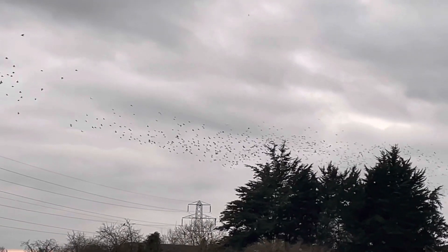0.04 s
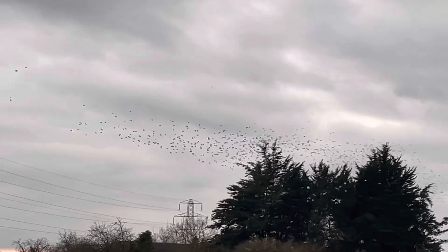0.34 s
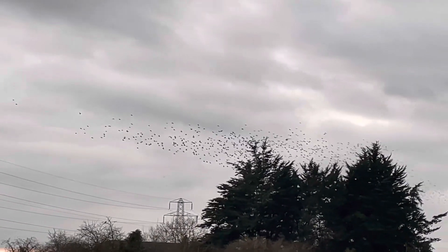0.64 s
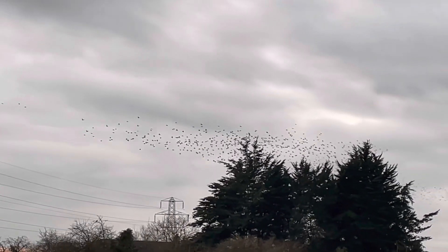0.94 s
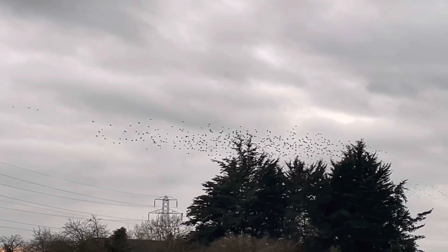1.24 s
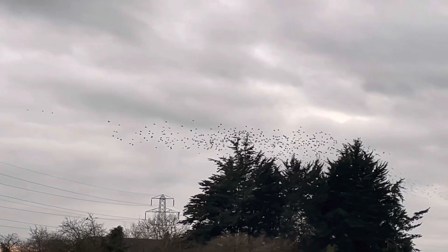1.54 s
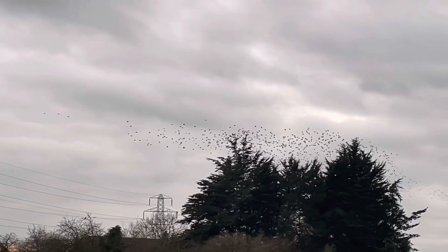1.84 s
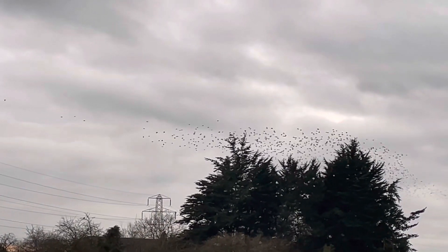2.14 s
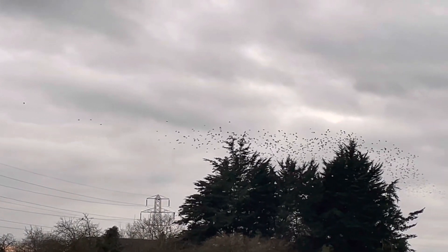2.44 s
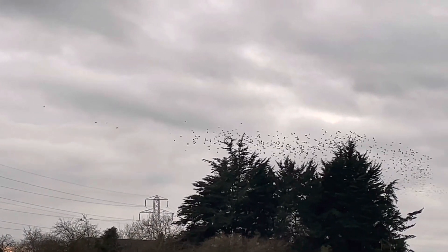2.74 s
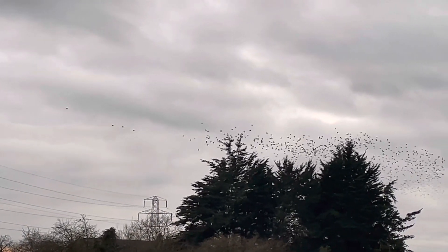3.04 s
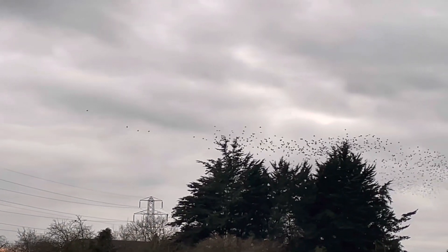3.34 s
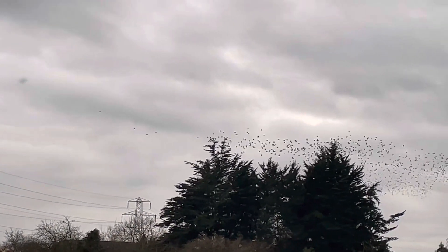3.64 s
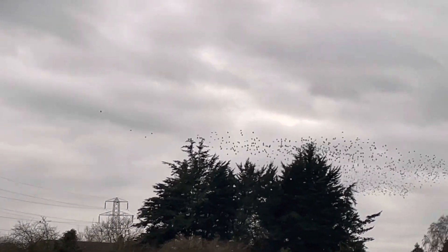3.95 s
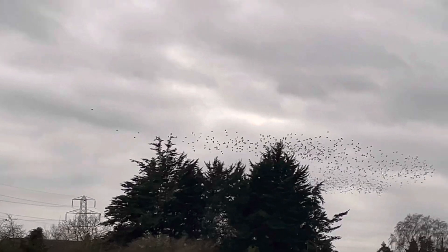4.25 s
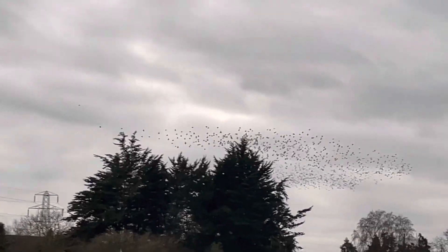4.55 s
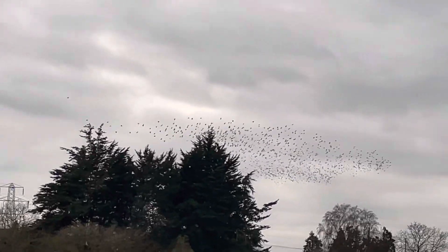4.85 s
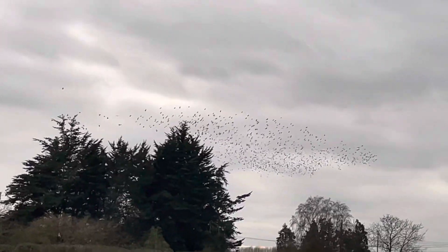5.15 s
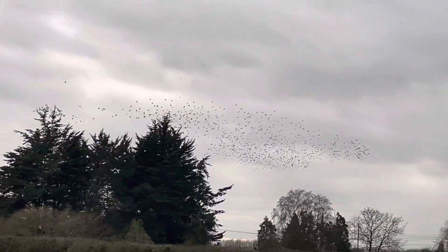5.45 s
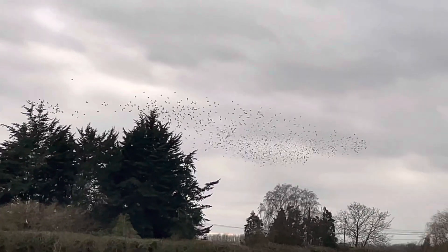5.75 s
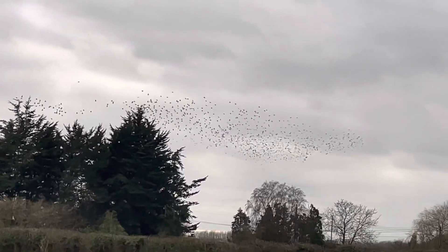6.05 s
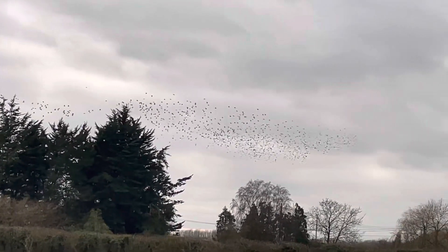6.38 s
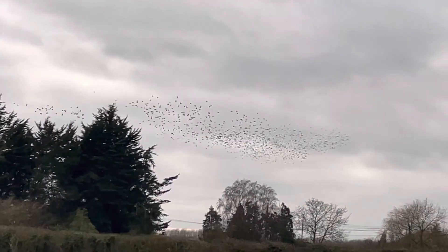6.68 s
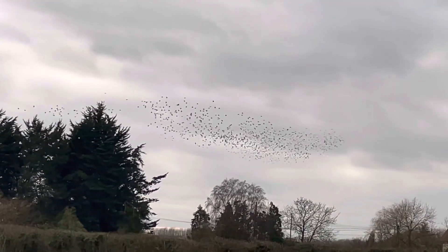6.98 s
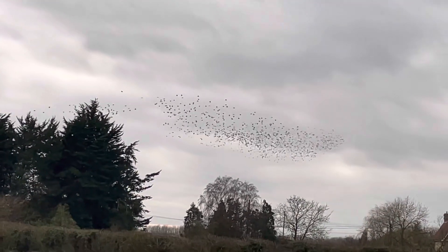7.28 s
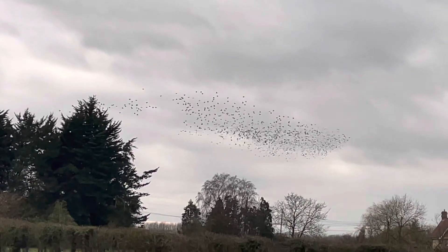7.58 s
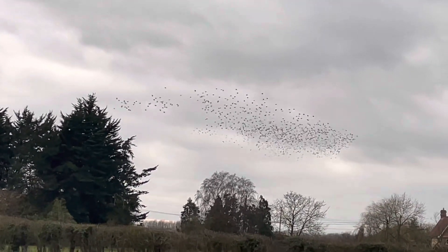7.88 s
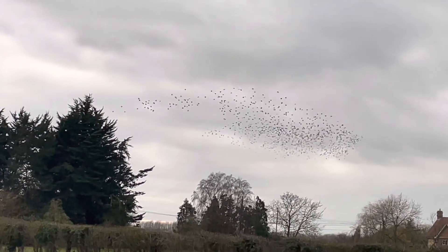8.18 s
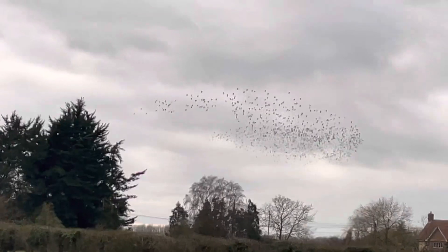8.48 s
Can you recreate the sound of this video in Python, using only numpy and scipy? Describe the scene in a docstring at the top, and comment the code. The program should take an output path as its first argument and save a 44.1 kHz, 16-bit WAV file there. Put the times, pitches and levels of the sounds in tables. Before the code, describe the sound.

Countless far-off birds call together in a high, hissing twitter, while a breeze softly buffets the microphone and a road hums.

```python
"""A large flock of starlings wheels over conifers across an open field on a winter evening.
Thousands of far calls merge into a rushing hiss that swells in flurries as neighbours set each other off.
Harsh squeals and thin whistles rise out of it: gliding syrinx tones, scattered by the trees.
Behind them a distant road hums, and a light breeze sheds eddies on the microphone, which ticks faintly."""
import sys
import numpy as np
from scipy import signal
from scipy.fft import rfft, irfft, next_fast_len
from scipy.io import wavfile
from scipy.ndimage import uniform_filter1d, map_coordinates

SR = 44100
rng = np.random.default_rng(int(sys.argv[2]) if len(sys.argv) > 2 else 0)


def transcribe(signal):
    """Save signal, clipped to [-1, 1], as a 16-bit WAV file at the path in sys.argv[1]."""
    frames = np.atleast_2d(signal).T
    limited = np.clip(frames, -1, 1)
    pcm = np.round(limited * 32767).astype(np.int16)
    wavfile.write(sys.argv[1], SR, pcm)


N = 384552

# The slow swell of the flock in three registers.
# Each row: time in seconds, then relative levels in dB of low chatter, twitter and shrill calls.
CHORUS = [(0.0, -55, -58, -59), (0.34, -58, -59.5, -61.5), (0.87, -55.5, -59, -54.5), (1.36, -57, -60, -60),
          (2.11, -55.5, -59, -55.5), (2.28, -56, -56.5, -57), (3.67, -57, -57.5, -56.5),
          (4.13, -57.5, -57.5, -58.5), (4.54, -57, -56.5, -55.5), (4.98, -59, -58, -59),
          (5.56, -56, -57.5, -54), (6.63, -58.5, -60, -59), (7.07, -56.5, -59.5, -55),
          (7.55, -55.5, -58.5, -59.5), (8.23, -56.5, -59, -56.5), (8.72, -56.5, -59, -62.5)]


def from_db(db):
    """Decibels to gain."""
    return 10 ** (np.asarray(db) / 20)


def rms_one(x):
    """Scale to unit power."""
    return x / np.sqrt(np.mean(x ** 2) + 1e-20)


def in_time(rows):
    """Turn rows of a time and its values into one sample-by-sample curve per value column."""
    times, *columns = np.transpose(rows)
    return [np.interp(np.arange(N) / SR, times, column) for column in columns]


def at_hz(points, hz):
    """Read a curve on a log-frequency axis."""
    known_hz, values = np.transpose(points)
    return np.interp(np.log(np.maximum(hz, 1)), np.log(known_hz), values)


def drift(rate):
    """A smooth random wobble of unit power that takes a new value `rate` times a second."""
    knots = rng.standard_normal(4096)
    coarse = map_coordinates(knots, [np.arange(0, N + 64, 64) * rate / SR], order=3, mode="wrap")
    return rms_one(np.interp(np.arange(N) / 64, np.arange(len(coarse)), coarse))


def add(out, start_s, sound):
    """Mix a sound in at its start time."""
    start = max(int(start_s * SR), 0)
    room = out[start:start + len(sound)]
    room += sound[:len(room)]


def coloured(x, spectrum):
    """Shape a sound with an EQ curve and bring it to unit power."""
    size = next_fast_len(N)
    hz = np.arange(size // 2 + 1) * SR / size
    return rms_one(irfft(rfft(x, size) * from_db(at_hz(spectrum, hz)), size)[..., :N])


def ports(x):
    """Sound meets the two microphone ports at a phase that depends on pitch; their sum keeps its level."""
    # Phase between the ports. Each row: frequency in Hz, lead of the left port in radians.
    port_phase = [(600, 0), (1300, 1.2), (1600, 0), (1900, -.7), (2200, 0), (2700, .38), (3600, 0),
                  (6300, 0), (6630, 1.45), (6950, 2.45), (7600, 2.6), (8500, 2.2), (9200, 1.55),
                  (10000, .1)]
    size = next_fast_len(N)
    lead = np.clip(at_hz(port_phase, np.arange(size // 2 + 1) * SR / size), -2.8, 2.8)
    side = irfft(rfft(x, size) * 1j * np.tan(lead / 2), size)[:N]
    return np.array([x + side, x - side])


def wash(spectrum, side_db):
    """Smooth far noise from a wide field, partly unlike at the two ports."""
    mid, side = coloured(rng.standard_normal((2, N)), spectrum)
    return ports(mid) + from_db(side_db) * side * [[1], [-1]]


def road():
    """Distant traffic blurs into a bed of tyre roar and low drone."""
    # The traffic's ebb and flow. Each row: time in seconds, relative roar and drone levels in dB.
    traffic = [(0.0, -68, -78.5), (.6, -70.5, -78.5), (1.2, -69.5, -74.5), (1.7, -67.5, -81.5),
               (2.4, -66, -80), (3.5, -67.5, -78.5), (4.01, -69, -76.5), (4.27, -71, -76.5),
               (4.66, -72.5, -83.5), (5.29, -70, -78), (6.41, -71, -74.5), (7.0, -70, -74.5),
               (7.41, -69, -79), (8.21, -69.5, -79), (8.4, -65.5, -68.5), (8.72, -70.5, -78)]
    # The colours of the roar and the drone. Each row: frequency in Hz, relative gain in dB.
    roar_eq = [(450, -20), (700, -6), (1000, 1), (1350, -4.5), (1750, -8), (3200, -17), (4500, -76)]
    drone_eq = [(30, 1.5), (70, 7), (150, 11.5), (350, 8), (470, -0.5), (650, 1), (1000, -9.5), (3500, -61)]
    roar_db, drone_db = in_time(traffic)
    roar = from_db(roar_db + 0.9) * wash(roar_eq, side_db=-4.0)
    drone = from_db(drone_db + 7.5) * wash(drone_eq, side_db=-7)
    return roar + drone


def tick(db, hz=720, rise_s=0.00041):
    """A dull tick, gone within a cycle or two."""
    t = np.arange(SR // 3) / SR
    envelope = t / rise_s * np.exp(1 - np.minimum(t / rise_s, 60))
    return from_db(db) * np.sin(2 * np.pi * hz * t) * envelope


def ticks(snap_s=0.1435, snap_db=-55, snap_decay_s=0.00025):
    """Light ticks on the microphone and one tiny bright snap on its housing."""
    # The ticks. Each row: start in seconds, envelope peak in dB.
    hits = [(.144, -43.5), (0.233, -47.5), (.275, -55), (0.333, -48), (3.931, -46.5), (4.072, -51),
            (8.478, -43.5), (8.516, -41), (8.544, -40.5)]
    out, t = np.zeros(N), np.arange(SR // 200) / SR
    for start_s, db in hits:
        add(out, start_s, tick(db))
    add(out, snap_s, from_db(snap_db) * rng.standard_normal(len(t)) * np.exp(-t / snap_decay_s))
    return out


def airflow_db(rise_share=0.56):
    """Gusts build and die away in bell shapes on top of the light air."""
    # Light air between gusts. Each row: time in seconds, level in dB.
    breeze = [(0, -50), (.6, -58.5), (1.5, -52), (2.25, -56), (2.7, -66), (3.4, -53.5), (3.85, -68),
              (4.8, -71.5), (5.2, -64.5), (5.95, -74.5), (6.15, -55), (6.55, -63), (7.1, -53.5),
              (7.65, -62), (8.2, -56.5), (8.72, -64)]
    # The gusts. Each row: time of the peak in seconds, length in seconds, peak level in dB.
    gusts = [(1.917, 0.4, -41.5), (3.48, 0.2, -49), (4.446, 0.16, -62.5), (5.044, 0.055, -54.5),
             (5.234, 0.12, -57), (6.778, 0.17, -56.5), (7.29, 0.043, -50), (7.503, 0.088, -54.5),
             (7.694, 0.056, -52.5), (7.98, 0.15, -53.5), (8.53, 0.24, -51.5)]
    breeze_db, = in_time(breeze)
    t, power = np.arange(N) / SR, from_db(breeze_db) ** 2
    for peak_s, length, db in gusts:
        from_peak = (t - peak_s) / (length * np.where(t < peak_s, rise_share, 1 - rise_share))
        power += from_db(db) ** 2 * np.exp(-2 * np.minimum(from_peak ** 2, 20))
    return 10 * np.log10(power)


def eddy(db, hz):
    """A vortex crosses the port: a puff that builds for some turns and sinks in pitch as it widens."""
    t = np.arange(SR // 3) / SR
    turns = 1.22 * (100 / hz) ** 0.36   # lower, wider eddies take more turns to build
    age = t * hz / turns   # 1 at the peak of the puff
    envelope = (2 * age / (1 + age * age)) ** 4
    return from_db(db) * np.sin(2 * np.pi * 3.1 * turns * np.log1p(age / 1.7)) * envelope


def wind(lumpy_db=2.5, side_db=-15, small_count=200):
    """Lumpy low buffeting swells with the breeze, small eddies less steeply; big eddies thump through."""
    # Single eddies on the microphone. Each row: start in seconds, level in dB, nominal pitch in Hz.
    thumps = [(.144, -40, 185), (0.232, -37.5, 198), (.275, -38, 190), (0.334, -38.5, 173),
              (.503, -47.5, 150), (1.168, -47.5, 230), (1.285, -51, 240), (1.553, -42, 64),
              (1.729, -37, 60.6), (1.794, -32, 61), (1.824, -31, 147), (1.87, -31.5, 70),
              (1.902, -29.5, 71), (1.986, -32, 72.5), (2.036, -39, 69), (3.022, -52, 140),
              (3.322, -47, 170), (3.343, -45.5, 144), (3.418, -42, 125), (3.459, -39.5, 85),
              (3.5, -45.5, 150), (3.61, -49.5, 165), (3.663, -46, 100), (3.702, -46.5, 72),
              (3.931, -56, 280), (4.052, -53.5, 230), (4.168, -53, 228), (4.4, -49.5, 145),
              (4.441, -44.5, 136), (5.03, -49, 94.5), (6.079, -48, 83.6), (6.181, -47, 93),
              (6.345, -42, 82), (6.43, -47.5, 85), (7.019, -43, 77), (7.184, -40, 68), (7.267, -48, 202),
              (7.42, -40.5, 72), (7.665, -48.5, 237), (7.814, -51, 175), (7.888, -49.5, 187),
              (7.95, -51, 210), (8.004, -49, 222), (8.063, -52, 164), (8.474, -40.5, 62)]
    # The colour of the buffeting. Each row: frequency in Hz, relative gain in dB.
    buffet_eq = [(20, -31), (35, -8), (50, 4), (72, 0.5), (98, -1.5), (125, -10), (180, -13), (260, -34.5),
                 (400, -62), (1500, -85)]
    level_db = airflow_db()
    small, big = np.zeros((2, N)), np.zeros(N)
    for when, pitch, weakness, left_share in rng.random((small_count, 4)):
        puff = eddy(-14 * weakness, 75 * 2 ** (1.86 * pitch)) + tick(-21.5)
        add(small[0], when * N / SR, left_share * puff)   # a small eddy favours one port
        add(small[1], when * N / SR, (1 - left_share) * puff)
    for start_s, db, hz in thumps:
        add(big, start_s, eddy(db, hz))
    mid, side = coloured(rng.standard_normal((2, N)), buffet_eq)
    mid = mid / np.sqrt(uniform_filter1d(mid ** 2, size=3500) + 1e-9)   # leave the slow swell to the air
    buffet = (mid + from_db(side_db) * side * [[1], [-1]]) * from_db(lumpy_db * drift(30))
    return from_db(level_db) * buffet + from_db(0.35 * level_db - 48) * rms_one(small) + big


def trees(x, t60, wet_db):
    """Trunks and hedges scatter a short diffuse tail behind each call."""
    t = np.arange(SR // 2) / SR
    tail = rng.standard_normal(len(t)) * from_db(-60 * t / t60)
    return x + from_db(wet_db) * signal.fftconvolve(x, tail / np.linalg.norm(tail))[:N]


def call(length, start_hz, end_hz, warble_hz, warble_rate, rasp_hz, wander=0, ragged_db=0):
    """A gliding, warbling syrinx tone: fast pitch jitter makes it harsh, wander and flicker ragged."""
    progress = np.linspace(0, 1, max(int(length * SR), 64))
    t = progress * length
    jitter = np.interp(t, np.arange(1024) / 1500, rng.standard_normal(1024))
    hz = start_hz + (end_hz - start_hz) * progress + rasp_hz * jitter
    hz += warble_hz * np.sin(2 * np.pi * (warble_rate * t + rng.random()))
    swell = np.sqrt(np.abs(np.sin(np.pi * progress)))
    if wander or ragged_db:
        bend, flicker = (np.interp(t, np.arange(64) / 70, knots) for knots in rng.standard_normal((2, 64)))
        hz *= 1 + wander * bend
        swell *= from_db(ragged_db * flicker)
    return rms_one(np.sin(2 * np.pi * np.cumsum(hz) / SR) * swell)


def crowd(low_hz, high_hz, length, fall, rasp_hz, uneven_db, count, wander=0):
    """Many birds calling at random, each at its own pitch and distance, mostly sliding down."""
    out = np.zeros(N)
    for when, pitch, stretch, slide, distance in rng.random((count, 5)):
        start_hz = low_hz + (high_hz - low_hz) * pitch
        end_hz = start_hz * np.exp(fall * (0.3 - slide))
        cry = call(length * (0.5 + stretch), start_hz, end_hz,
                   warble_hz=37.8, warble_rate=30.7, rasp_hz=rasp_hz, wander=wander)
        add(out, when * N / SR, from_db(-uneven_db * np.sqrt(distance)) * cry)
    return rms_one(out)


def flurry_db(register_hz, spread_octaves=0.64):
    """Neighbours set each other calling: each flurry lifts the registers near its pitch in one arch."""
    # The flurries. Each row: middle in seconds, length in seconds, lift in dB at its pitch, pitch in Hz.
    flurries = [(0.068, 0.085, 6.5, 5600), (0.358, 0.27, 8, 6000), (0.644, 0.16, 3, 3700),
                (.97, .1, 2, 5000), (1.868, 0.32, 3, 5250), (2.03, 0.06, 2.5, 4500),
                (2.554, 0.092, 2.5, 4700), (2.713, 0.16, 7, 4700), (3.068, 0.12, 3, 5200),
                (3.435, 0.26, 5, 4870), (3.613, 0.11, 5.5, 4800), (3.774, 0.18, 3, 5700),
                (4.774, 0.24, 3.5, 5740), (5.244, 0.16, 5, 5500), (5.73, 0.26, 3, 5800),
                (6.42, 0.29, 5, 6240), (6.778, 0.14, 4, 5370), (8.37, 0.21, 3.5, 5130),
                (8.67, 0.068, 2.5, 4200)]
    t, lift = np.arange(N) / SR, np.zeros(N)
    for middle_s, length, db, hz in flurries:
        reach = np.exp(-(np.log2(register_hz / hz) / spread_octaves) ** 2)
        during = np.abs(t - middle_s) < length / 2
        lift[during] += db * reach * np.cos(np.pi * (t[during] - middle_s) / length)
    return lift


def far_whistles():
    """A tangle of faint, very high whistles from deeper in the flock."""
    tangle = crowd(7300, 9000, length=0.075, fall=0.11, rasp_hz=90, uneven_db=6, count=90, wander=0.009)
    return from_db(-85) * tangle


def whistles():
    """Thin, ragged, wavering whistles of single birds."""
    # The whistles. Each row: start and length in seconds, start and end pitch in Hz,
    # warble depth in Hz, level in dB.
    notes = [(0.09, 0.13, 8400, 7900, 22, -83), (.27, .11, 7900, 7650, 20, -86),
             (1.044, 0.06, 8200, 8200, 20, -79), (1.653, 0.16, 8530, 8160, 112, -76),
             (2.235, 0.14, 8550, 8950, 45, -77), (2.465, 0.1, 3300, 3420, -3, -63),
             (2.653, 0.1, 2290, 2350, -1, -63), (3.48, 0.135, 8500, 8950, 35, -74),
             (4.015, 0.15, 8140, 8550, 90, -76), (4.224, .03, 9200, 9150, 0, -79),
             (4.294, 0.13, 2414, 2445, 5, -62.5), (4.316, 0.064, 8930, 8700, -2, -75.5),
             (4.447, 0.1, 7840, 8450, 60, -77), (4.62, 0.16, 8700, 7400, 60, -77),
             (4.727, 0.2, 7900, 8180, 30, -74.5), (5.423, .11, 7500, 8050, 50, -80),
             (5.623, .05, 7400, 7800, 30, -78), (5.666, 0.17, 7950, 8400, 30, -76),
             (5.8, 0.073, 8350, 9000, 30, -76), (5.845, 0.19, 7500, 8200, 298, -71.5),
             (5.94, .07, 9100, 9100, 58, -76), (6.085, 0.054, 5700, 6200, 3, -56.5),
             (6.296, 0.15, 7650, 7600, 70, -82), (6.317, 0.18, 7830, 8730, 67, -77),
             (6.47, 0.11, 7800, 8450, 52, -80), (6.48, 0.23, 8760, 8900, 108, -79),
             (6.51, 0.13, 7400, 7800, 80, -75), (6.797, 0.16, 8650, 8250, 110, -76.5),
             (7.02, 0.059, 5600, 6780, 0, -66), (7.107, 0.19, 3380, 3060, 2, -64),
             (7.085, .06, 8900, 8400, 40, -78), (7.178, 0.087, 9050, 8950, 200, -76),
             (7.375, 0.1, 8450, 8550, 18, -81), (7.738, .28, 9250, 8240, 72, -75.5),
             (7.85, 0.091, 2060, 1894, 4, -64), (8.407, 0.3, 9300, 8500, 75, -76.5),
             (8.575, 0.059, 2870, 2960, -2, -64)]
    out = np.zeros(N)
    for start_s, length, start_hz, end_hz, warble_hz, db in notes:
        note = call(length, start_hz, end_hz, warble_hz,
                    warble_rate=25, rasp_hz=0.012 * start_hz, wander=0.0055, ragged_db=2.5)
        add(out, start_s, from_db(db) * note)
    return trees(out, t60=0.25, wet_db=-11)


def squeals(fall_octaves=0.22):
    """Harsh calls of the nearest birds, each sliding down by the same interval."""
    # The squeals. Each row: start and length in seconds, start pitch in Hz, relative level in dB.
    cries = [(0.0, 0.07, 7260, -71), (.72, .11, 7770, -74), (1.27, 0.05, 5940, -60),
             (2.08, 0.064, 6750, -60.5), (2.147, 0.075, 5550, -56.5), (2.291, 0.059, 6760, -61),
             (2.67, .06, 5100, -58.5), (3.065, 0.057, 5600, -59), (3.455, .065, 5500, -60),
             (5.187, 0.066, 6300, -63), (5.665, .1, 6710, -61), (6.033, 0.08, 6470, -64),
             (6.107, 0.08, 5430, -57.5), (6.267, 0.061, 6850, -60), (6.547, 0.033, 4700, -57),
             (6.79, 0.087, 5480, -58), (8.263, 0.11, 6080, -62)]
    out = np.zeros(N)
    for start_s, length, start_hz, db in cries:
        cry = call(length, start_hz, start_hz / 2 ** fall_octaves, warble_hz=40, warble_rate=70, rasp_hz=190)
        add(out, start_s, from_db(db + 0.5) * cry)
    return trees(out, t60=0.19, wet_db=-9.5)


def near_chirps():
    """Short overlapping chirps from the near edge of the flock ride the swell of the chorus."""
    _, _, shrill_db = in_time(CHORUS)
    chirps = crowd(4500, 6500, length=0.036, fall=0.2, rasp_hz=120, uneven_db=3, count=300, wander=0.012)
    return trees(from_db(shrill_db + flurry_db(5500) - 8) * chirps, t60=0.2, wet_db=-10)


def choir(voices, spectrum, voices_db, surge_db, surge_rate):
    """Nearer voices sit in the smooth hiss of the countless far ones, and the level flutters."""
    together = coloured(rng.standard_normal(N) + from_db(voices_db) * voices, spectrum)
    return together * from_db(surge_db * drift(surge_rate))


def flock():
    """The chorus in three registers swells slowly as the birds turn, and quickly in flurries."""
    # The colours of the low, middle and high voices. Each row: frequency in Hz, relative gain in dB.
    chatter_eq = [(1200, -27.5), (1600, -14), (1950, -2.5), (2500, 2), (2900, 2.5), (3250, -3.5),
                  (3600, -23), (4600, -74)]
    twitter_eq = [(2800, -37.5), (3350, -3.5), (3800, -0.5), (4250, 1.5), (4800, 0), (5200, -5.5),
                  (6000, -55.5)]
    shrill_eq = [(4000, -27), (4800, -7), (5250, 5.5), (5700, 4.5), (6200, 3.5), (6550, -1.5), (6900, -15),
                 (7300, -17), (8600, -21.5), (9500, -23.5), (10500, -38.5), (12000, -50), (13000, -69.5)]
    chatter_db, twitter_db, shrill_db = in_time(CHORUS)
    low = crowd(1800, 3500, length=0.0686, fall=0.1953, rasp_hz=114.7, uneven_db=3.5, count=1200)
    middle = crowd(3500, 5200, length=0.06, fall=0.25, rasp_hz=200, uneven_db=6, count=1000)
    high = crowd(5000, 9000, length=0.05, fall=0.27, rasp_hz=194, uneven_db=9, count=1800)
    chatter = choir(low, chatter_eq, voices_db=-14.0, surge_db=0.73, surge_rate=41)
    twitter = choir(middle, twitter_eq, voices_db=-11.5, surge_db=0.7, surge_rate=40)
    shrill = choir(high, shrill_eq, voices_db=-10.5, surge_db=1.2, surge_rate=45)
    chatter *= from_db(chatter_db + flurry_db(3000) - 1.35)
    twitter *= from_db(twitter_db + flurry_db(3400) + 0.32)
    shrill *= from_db(shrill_db + flurry_db(7100) - 1.5)
    # Low chatter echoing round the field is a wide, soft hiss.
    scattered = from_db(chatter_db - 16.0) * coloured(rng.standard_normal(N), chatter_eq)
    return ports(chatter + twitter + shrill) + scattered * [[1], [-1]]


def scene():
    """The flock and its single voices over the road, the breeze and the ticks, in stereo."""
    return flock() + ports(near_chirps() + squeals() + whistles() + far_whistles()) + road() + wind() + ticks()


def record(dry):
    """A steep low-pass removes everything above 15.5 kHz."""
    return signal.sosfilt(signal.cheby2(12, 70, 15500, fs=SR, output="sos"), dry)


dry = scene()
out = record(dry)
transcribe(out)
```